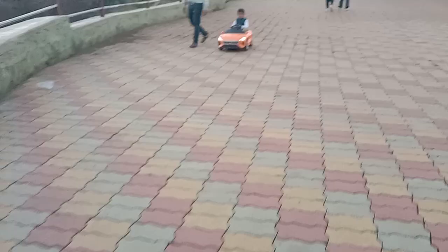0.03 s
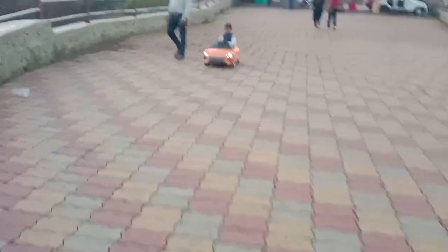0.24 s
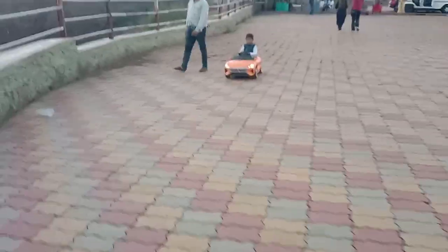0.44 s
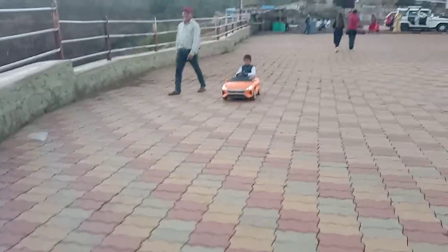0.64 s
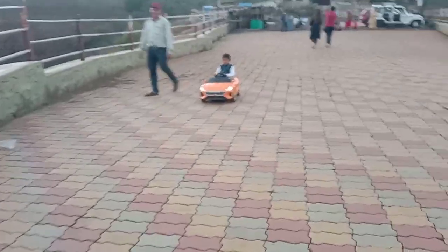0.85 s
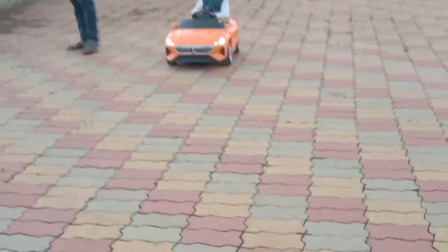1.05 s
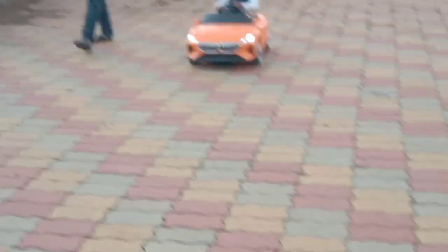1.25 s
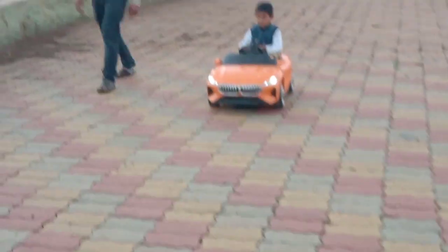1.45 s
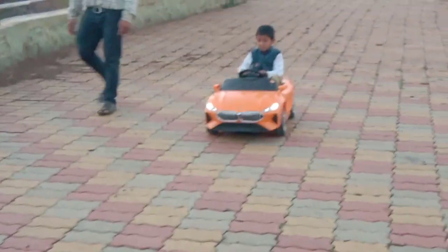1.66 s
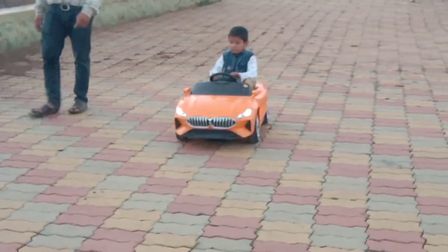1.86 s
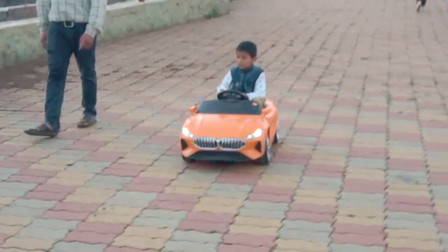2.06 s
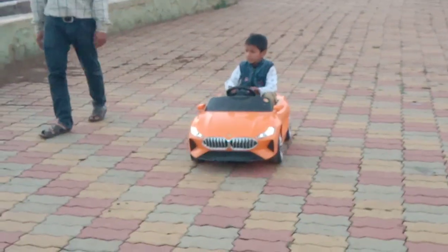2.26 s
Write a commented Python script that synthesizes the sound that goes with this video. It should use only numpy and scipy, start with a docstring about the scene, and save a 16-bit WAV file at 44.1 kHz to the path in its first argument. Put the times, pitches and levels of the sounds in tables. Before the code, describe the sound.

Small electric toy car with whining plastic gears rattles closer, hard wheels clacking over paving joints

```python
"""Out of silence fingers tick on the phone while a child's battery car fades in, rolling up over block paving.
Gear contacts, dense random clicks, ring in housing and hollow body; sines add a whine and a whistle.
The hard wheels clack as short rings over the joints, once faintly near 0.16 s and often from 0.74 s;
loose parts rattle from 0.19 s on, low tones boom over bumps, filtered clicks rumble as rolling.
A hard tick and a thin squeal come near 0.4 s; wind puffs, low wavering tones, are strongest near the end."""
import sys
import numpy as np
from scipy import signal
from scipy.io import wavfile

SR = 44100
rng = np.random.default_rng(int(sys.argv[2]) if len(sys.argv) > 2 else 0)


def wav_record(signal):
    """Record a signal, one row per channel, as 16-bit PCM in the file named by sys.argv[1]."""
    frames = np.transpose(np.atleast_2d(signal))
    bounded = np.clip(frames, -1, 1)
    # unit amplitude maps onto the largest positive 16-bit level
    quanta = np.round(bounded * 32767).astype(np.int16)
    wavfile.write(sys.argv[1], SR, quanta)


N = 101562


def amp(db):
    """Decibels to amplitude."""
    return 10 ** (np.asarray(db) / 20)


def unit(x):
    """Scale to rms 1."""
    return x / np.sqrt(np.mean(x ** 2) + 1e-20)


def in_time(rows):
    """Interpolate each column over the time in the first."""
    time_s, *columns = np.transpose(rows)
    return [np.interp(np.arange(N) / SR, time_s, column) for column in columns]


def drift(rate_hz):
    """Slow random wander of spread 1, clipped at 2: noise through a double low-pass pole."""
    r = np.exp(-2 * np.pi * rate_hz / SR)
    noise = rng.standard_normal(N + SR)
    settled = signal.lfilter([1], [1, -2 * r, r * r], noise)[SR:]
    return np.clip(unit(settled), -2, 2)


def peak(x, hz, width_hz):
    """One resonance, gain 1 on top."""
    r = np.exp(-np.pi * abs(width_hz) / SR)
    poles = [1, -2 * r * np.cos(2 * np.pi * hz / SR), r * r]
    return signal.lfilter([(1 - r * r) / 2, 0, (r * r - 1) / 2], poles, x)


def ring(clicks, hz, t60_s):
    """A unit click sets a decaying sine of starting height 1 ringing."""
    r, w = amp(-60 / (abs(t60_s) * SR)), 2 * np.pi * hz / SR
    return signal.lfilter([0, np.sin(w)], [1, -2 * r * np.cos(w), r * r], clicks + 1e-18)


def body(x, modes, flicker_db=0):
    """Steep parallel resonances of alternating sign, each flickering on its own; rms 1."""
    out = 0
    for k, (hz, width_hz, db) in enumerate(modes):
        mode = peak(peak(x, hz, width_hz), hz, width_hz)
        out = out + (-1) ** k * amp(db + flicker_db * drift(29.0)) * mode
    return unit(out)


DULL_HZ = 5230


def dull(x):
    """Steep loss of the top."""
    return signal.sosfilt(signal.butter(5, DULL_HZ, fs=SR, output="sos"), x)


GRAINS_PER_S, GRAIN_SPREAD_DB, FLUTTER_DB = 3000, 2.1, 1.5


def grains():
    """Small contacts: dense clicks of random size and sign, fluttering in level."""
    sizes = amp(GRAIN_SPREAD_DB * np.minimum(rng.exponential(1, N), 5)) * rng.choice([-1, 1], N)
    hits = rng.random(N) < GRAINS_PER_S / SR
    return sizes * hits * amp(FLUTTER_DB * drift(40))


def swells(rows, stretch, rough_rad, lumpy_db):
    """Short tones that swell and fade about their time, wavering in phase and level."""
    t, out = np.arange(N) / SR, np.zeros(N)
    wobble = rough_rad * drift(12.5)
    phases = rng.uniform(0, 2 * np.pi, len(rows))
    for (time_s, db, hz, length_s), phase in zip(rows, phases):
        swell = np.exp(-((t - time_s) / (stretch * length_s)) ** 2)
        out += amp(db) * swell * np.sin(2 * np.pi * hz * t + phase + wobble)
    return out * amp(lumpy_db * drift(116))


# hum of the hollow body: (time [s], broad low mids [dB], middle mode [dB], upper mode [dB])
HUM = [(.08, -46.5, -72, -66), (.19, -96, -56, -53.5), (.3, -115, -47.5, -48), (.4, -50, -54, -48.5),
       (.52, -47, -48, -44), (.6, -55, -54, -49.5), (.69, -51.5, -51.5, -43), (.93, -49.5, -44, -44.5),
       (1.03, -45, -47, -47), (1.2, -60, -47, -44.5), (1.6, -50.5, -51, -50.5), (1.65, -48, -53, -44),
       (1.81, -45.5, -51.5, -44), (2.3, -50.5, -51.5, -44)]
# body modes: (frequency [Hz], width [Hz])
HUM_MODES = [(490, 260), (620, 130), (1275, 125)]
HUM_FLICKER_DB = 1.2


def hum(teeth):
    """Gear contacts drive the modes of the hollow body, each with its own level."""
    out = 0
    for db, (hz, width_hz) in zip(in_time(HUM), HUM_MODES):
        out = out + amp(db) * body(teeth, [(hz, width_hz, 0)], HUM_FLICKER_DB)
    return out


WHINE_HZ, WHINE_WANDER, WHINE_DB = 2790, .026, -6.5  # tooth rate; relative drift; re chatter
WHISTLE_HZ, WHISTLE_WANDER, WHISTLE_DB = 11060, .008, -29  # relative drift; re chatter
WHINE_FLICKER_DB = 4.0  # both tones


def whine(chatter_db):
    """Sines follow the chatter level: one wanders at the tooth rate, a fainter whistle far above."""
    whine_hz = WHINE_HZ * (1 + WHINE_WANDER * (drift(5.57) + 0.598 * drift(53.0)))
    whine_amp = amp(chatter_db + WHINE_DB + WHINE_FLICKER_DB * drift(14))
    whistle_hz = WHISTLE_HZ * (1 + WHISTLE_WANDER * (drift(2.6) + 2 * drift(188)))
    whistle_amp = amp(chatter_db + WHISTLE_DB + WHINE_FLICKER_DB * drift(9.3))
    low_tone = whine_amp * np.sin(2 * np.pi * np.cumsum(whine_hz) / SR)
    high_tone = whistle_amp * np.sin(2 * np.pi * np.cumsum(whistle_hz) / SR)
    return low_tone + high_tone


# whirr levels: (time [s], gear chatter [dB], its treble [dB], hiss near 7 kHz [dB], top [dB])
WHIRR = [(.08, -103, -105, -105, -100), (.12, -53, -48.5, -107, -83), (.18, -64, -58, -68, -72),
         (.25, -50, -53.5, -59.5, -63), (.34, -56, -50, -64, -67), (.41, -41.5, -38, -54.5, -54),
         (.47, -47, -46, -77, -75), (.51, -43, -52, -95, -72), (.87, -40, -48, -84, -69),
         (1.1, -38.5, -52, -75, -66.5), (1.4, -43, -53, -81, -65.5), (1.61, -42.5, -59.5, -74, -65.5),
         (2.3, -40.5, -55, -92, -62.5)]
# gear housing resonances: (frequency [Hz], width [Hz], relative level [dB])
CHATTER = [(2020, 760, -7), (2757, 620, -4.5), (3310, 630, -5), (3713, 510, -1)]
# treble resonances: (frequency [Hz], width [Hz], relative level [dB])
TREBLE = [(5160, 154, 8.5), (5300, 1330, 2)]
# hiss resonance: (frequency [Hz], width [Hz], relative level [dB])
HISS = [(7300, 740, 0)]
# top resonances: (frequency [Hz], width [Hz], relative level [dB])
TOP = [(10500, 4800, 9), (15250, 890, 9.5)]
PATCHY_DB = 3.5  # flicker of each resonance


def whirr():
    """Gear contacts ring in the housing and drive the hollow body; whine and whistle ride on top."""
    teeth, levels_db = grains(), in_time(WHIRR)
    modes = (CHATTER, TREBLE, HISS, TOP)
    chatter, treble, hiss, top = [amp(db) * body(teeth, m, PATCHY_DB) for db, m in zip(levels_db, modes)]
    return dull(chatter + treble + hum(teeth)) + hiss + top + whine(levels_db[0])


# wheel clacks: (time [s], peak level [dB], pitch [Hz], fizz level [dB])
CLACKS = [(.1597, -28.5, 3000, -61), (0.7426, -13, 3680, -41), (0.8973, -17.5, 2890, -45),
          (1.1701, -22, 3700, -47), (1.2145, -25, 3400, -45), (1.2814, -15, 3400, -41),
          (1.3891, -17, 3380, -47.5), (1.4839, -18, 3580, -41.5), (1.5528, -20.5, 3220, -46),
          (1.5752, -26.5, 3640, -46), (1.7009, -11, 3240, -36), (1.7254, -14, 3400, -42),
          (1.9133, -7, 3380, -38), (1.9993, -33.5, 3420, -41.5), (2.1744, -10.5, 3200, -43.5)]
# longer rattles of loose parts: (start [s], length [s], level [dB], top level [dB])
RATTLES = [(0.193, 0.0046, -64, -60), (0.235, 0.0088, -47, -50), (0.283, 0.021, -46.5, -51.5),
           (0.445, 0.011, -36.5, -53), (0.526, 0.013, -38, -53), (0.656, 0.016, -34, -58),
           (0.906, 0.027, -32, -52), (0.953, 0.031, -38, -56), (1.055, 0.02, -34, -52),
           (1.099, 0.026, -42, -54), (1.453, 0.014, -39, -53), (1.945, 0.028, -32.5, -51.5),
           (2.096, 0.0067, -43, -53.5)]
CLACK_S = .00035  # half length of the ring
RATTLE_DELAY_S, RATTLE_LENGTH_S, RATTLE_DB = .007, .004, -17.0  # loose parts answer each clack
FIZZ_T60_S = 0.049


def clacks():
    """A very short ring per joint, a rattle just after it and a bright fizz; longer rattles besides."""
    out, rattle, fizz = np.zeros((3, N + SR))
    t = np.arange(2500) / SR
    shape = np.exp(-(t / CLACK_S - 2) ** 2)
    answer = np.exp(-((t - RATTLE_DELAY_S) / RATTLE_LENGTH_S) ** 2)
    for time_s, db, hz, top_db in CLACKS:
        i = int(time_s * SR)
        out[i:i + 2500] += amp(db) * shape * np.sin(2 * np.pi * hz * t)
        rattle[i:i + 2500] += amp(db + RATTLE_DB) * answer
        fizz[i:i + 2500] += amp(top_db - 60 * t / FIZZ_T60_S) * np.clip(t / 0.0004, 0, 1)
    for start_s, length_s, db, top_db in RATTLES:
        i = int(start_s * SR)
        hold = np.clip(t / 0.0021, 0, 1) * np.clip((length_s - t) / 0.0013 + 1, 0, 1)
        rattle[i:i + 2500] += amp(db) * hold
        fizz[i:i + 2500] += amp(top_db) * hold
    loose = grains() * amp(2.3 * drift(250))
    # modes: (frequency [Hz], width [Hz], relative level [dB])
    bright = body(loose, [(4960, 1850, 4), (10230, 3300, -9.5), (15200, 3300, -7.0)], 0.95)
    rattling = body(loose, [(3530, 630, 1.0), (2707, 370, -2.8)])
    return out[:N] + dull(rattle[:N] * rattling) + fizz[:N] * bright


# rolling spectrum: (frequency [Hz], relative level [dB per Hz])
ROLL = [(40, -29), (90, -25.5), (215, 7.5), (330, -21.5), (800, -32), (1100, -2), (1650, -10.5),
        (3500, -2.5), (6000, -24.5)]
# rolling level: (time [s], level [dB])
ROLL_LEVEL = [(.08, -104), (.13, -52), (.38, -45), (.45, -42), (2.3, -38)]


def rolling():
    """Broad rumble and hiss of hard wheels on paving: clicks in half-octave bands of patchy level."""
    hz, db = np.transpose(ROLL)
    grit, out = [grains(), grains()], 0
    edges_hz = 40 * 2 ** np.arange(0, 8.1, .5)
    for k, (low, high) in enumerate(zip(edges_hz, edges_hz[1:])):
        band = signal.sosfilt(signal.butter(2, [low, high], "band", fs=SR, output="sos"), grit[k % 2])
        band_db = np.interp(np.log(low * high) / 2, np.log(hz), db)
        out = out + amp(band_db + 2.4 * drift(16)) * band
    return amp(in_time(ROLL_LEVEL)[0]) * unit(out)


# the body booms over a bump: (time [s], level [dB], pitch [Hz], length [s])
BOOMS = [(.205, -44.5, 223, 0.038), (.3, -38, 205, 0.027), (.359, -32.5, 227.7, 0.023),
         (.532, -35.5, 242, 0.029), (.69, -34.5, 226.1, 0.071), (.702, -34.5, 637, 0.045),
         (.936, -30.5, 199, 0.015), (1.008, -35, 651, 0.0096), (1.03, -30, 237, 0.022),
         (1.076, -40.5, 234, 0.061), (1.166, -38, 211.4, 0.051), (1.487, -39.5, 225.1, 0.11),
         (1.636, -36, 570, 0.014), (1.826, -29.5, 217.4, 0.018), (2.028, -34, 228.8, 0.021),
         (2.13, -38.5, 307.4, 0.022)]


def booms():
    """Each bump sets the hollow body off in a short low swell."""
    return swells(BOOMS, stretch=0.68, rough_rad=1.0, lumpy_db=2.02)


# finger ticks: (time [s], level [dB])
TICKS = [(0.0835, -36), (0.0915, -41), (0.125, -24), (0.1289, -27), (0.1344, -25), (0.1375, -25),
         (0.1398, -21.5), (0.1441, -37), (0.1458, -25.5), (0.1488, -31), (0.1506, -25), (0.1506, -29),
         (.4249, -7)]
# phone case modes: (frequency [Hz], level re tick [dB], t60 [s])
KNOCK = [(119, -10.5, 0.069), (1194, -21, 0.047), (280, -27, 0.028)]
TICK_S, TICK_EDGE_DB = .00009, -20  # half width of the pulse; sharp edge of the light touches


def ticks():
    """Each touch is a soft one-sided pulse and a dull ring of the case; the light flurry crackles."""
    clicks = np.zeros(N)
    for time_s, db in TICKS:
        clicks[int(time_s * SR)] = amp(db)
    pulse_t = np.arange(-30, 31) / SR
    pulse = np.convolve(clicks, np.exp(-(pulse_t / TICK_S) ** 2 / 2), "same")
    t = np.arange(N) / SR
    light = clicks * (t > .11) * (t < .2)
    edge = amp(TICK_EDGE_DB) * signal.lfilter([1], [1, -.97], light) * rng.standard_normal(N)
    knock = sum(amp(db) * ring(clicks, hz, t60_s) for hz, db, t60_s in KNOCK)
    return knock - pulse - edge


# thin squeal: (time [s], level [dB], pitch [Hz], length [s])
SQUEAL = [(.44, -53, 5080, .08)]


def squeal():
    """One brief thin tone with a strongly wandering phase."""
    return swells(SQUEAL, stretch=1, rough_rad=20, lumpy_db=0)


# wind puffs: (time [s], level [dB], pitch [Hz], length [s])
PUFFS = [(.145, -55, 85.6, 0.029), (.676, -49.5, 95, 0.023), (1.29, -53, 71.2, 0.035),
         (1.529, -47, 76.2, 0.059), (1.676, -43, 84.3, 0.011), (1.88, -41, 87.1, 0.023),
         (1.998, -50, 81, 0.037), (2.085, -34.5, 90, 0.021), (2.167, -30.5, 90, 0.052),
         (2.236, -29.5, 121.5, 0.017), (2.285, -44, 74.8, 0.031)]


def puffs():
    """Wind on the microphone: low swells, uneven in phase and level."""
    return swells(PUFFS, stretch=0.82, rough_rad=1.65, lumpy_db=4.0)


def scene():
    """All sources, one channel."""
    car = whirr() + clacks() + dull(rolling()) + booms() + squeal()
    return (car + ticks() + puffs())[None]


START_S, CUTOFF_HZ = .077, 15850


def record(dry):
    """Silent until the start; the deepest bass and the top are cut."""
    on = np.clip((np.arange(N) / SR - START_S) / 0.0036, 0, 1)
    thin = signal.sosfilt(signal.butter(2, 45, "high", fs=SR, output="sos"), dry * on)
    return signal.sosfilt(signal.cheby2(16, 50, CUTOFF_HZ, fs=SR, output="sos"), thin)


dry = scene()
out = record(dry)
wav_record(out)
```